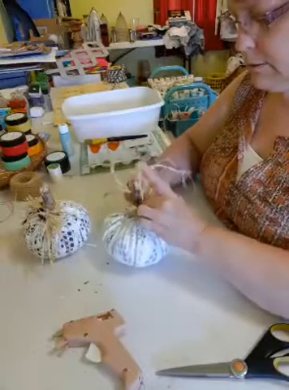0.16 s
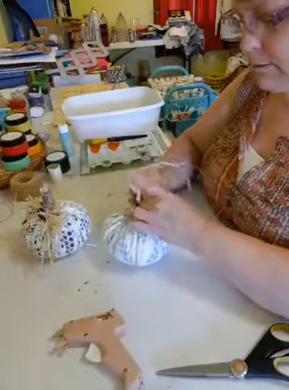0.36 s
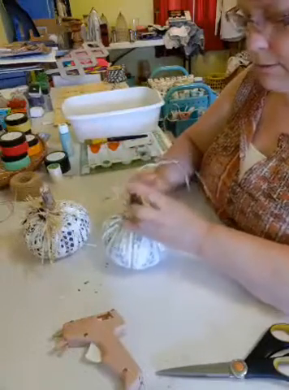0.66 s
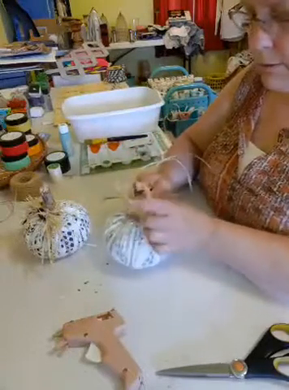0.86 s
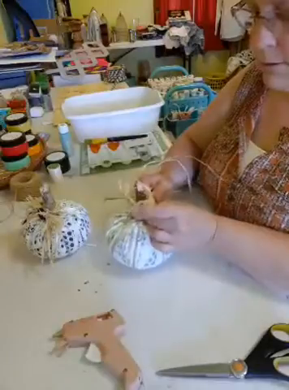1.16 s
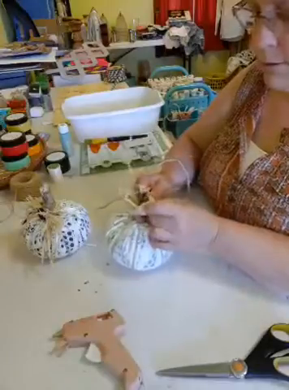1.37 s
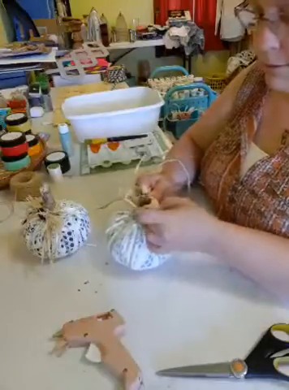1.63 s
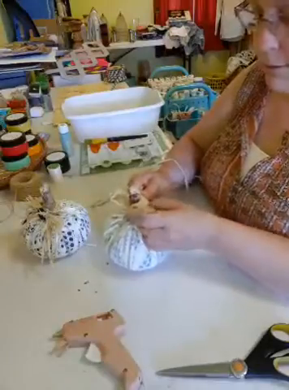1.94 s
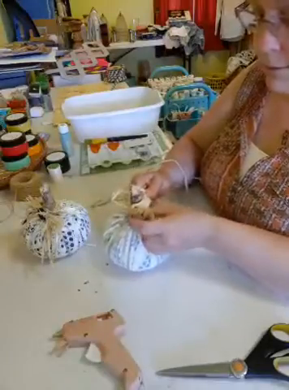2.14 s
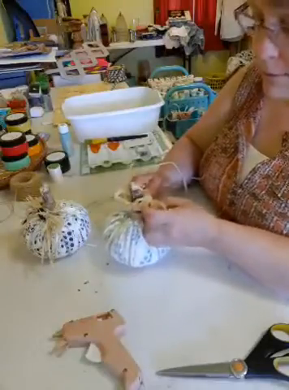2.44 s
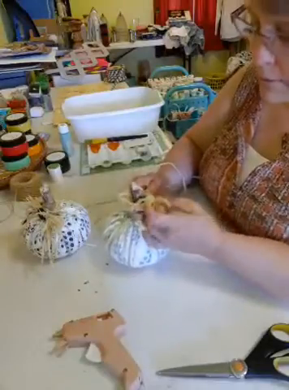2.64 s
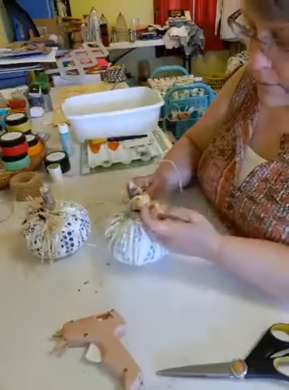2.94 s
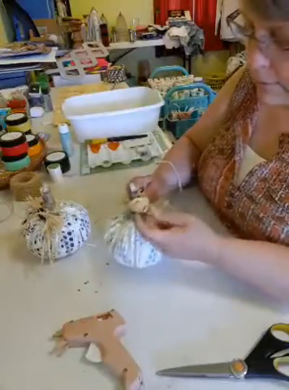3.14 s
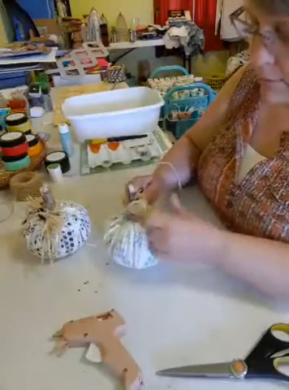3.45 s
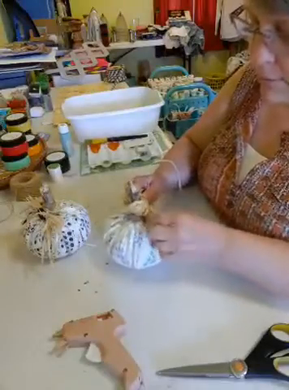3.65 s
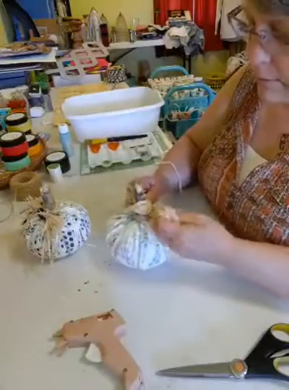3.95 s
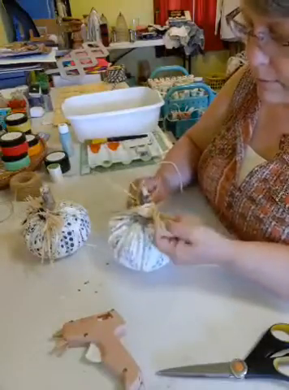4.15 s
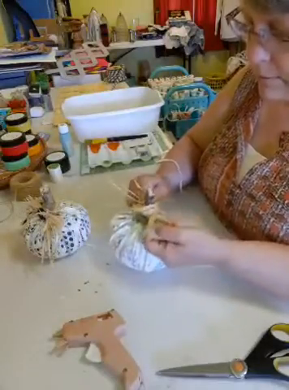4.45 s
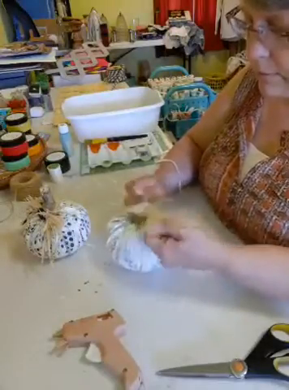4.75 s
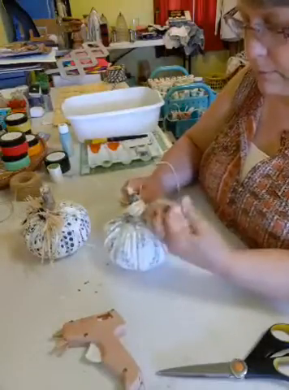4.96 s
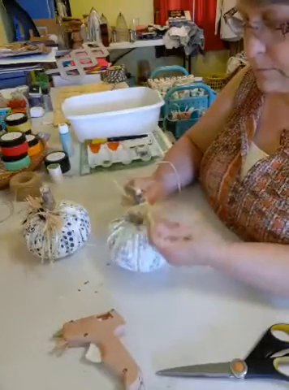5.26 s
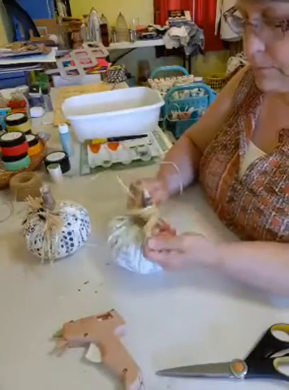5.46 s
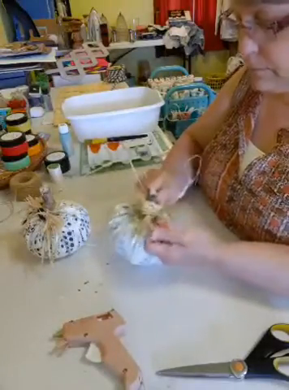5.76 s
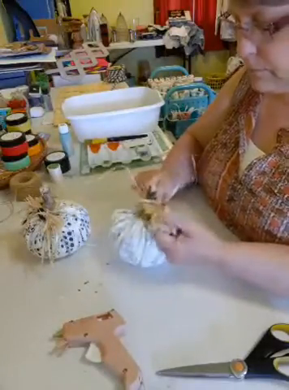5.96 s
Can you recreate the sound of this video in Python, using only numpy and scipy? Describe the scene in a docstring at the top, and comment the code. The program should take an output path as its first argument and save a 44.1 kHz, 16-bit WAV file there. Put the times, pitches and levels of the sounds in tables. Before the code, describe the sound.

Hands tie dry raffia round the stem of a small fabric pumpkin, heard close in a small room. Papery rustling never quite stops, with short scratchy pulls and bright little snaps. Soft finger taps come mostly early, the crackle grows denser and sharper from the middle on, and a brief hand rub comes near the end. A low electrical hum throbs gently underneath.

```python
"""A small room with a craft table: hands tie dry raffia round the stem of a fabric pumpkin, close up.
Pulled strands crackle as dense stick-slip clicks through strand resonances; kinks snap as ringing clicks.
Fingers tap (damped modes), brush and rub the pumpkin (filtered friction); strand ends flick the stem.
Soft bumps push the table (sinking low tones), and the room hums with a slow throb (beating sines) over air noise."""
import sys
import numpy as np
from scipy import signal
from scipy.fft import rfft, irfft, next_fast_len
from scipy.io import wavfile
from scipy.ndimage import map_coordinates

SR = 44100
rng = np.random.default_rng(int(sys.argv[2]) if len(sys.argv) > 2 else 0)


def store_wav(level_fs):
    """Save 16-bit WAV to argv[1]."""
    pcm = np.round(np.clip(np.atleast_2d(level_fs), -1, 1) * 32767)
    wavfile.write(sys.argv[1], SR, pcm.T.astype(np.int16))


N = 269010
T = np.arange(N) / SR  # time in s

# mains hum and motors running just beside it: [f/Hz, rms level/dB]
HUM_LINES = [(58.1, -74), (113.2, -85), (116.7, -80), (120, -55), (123.4, -73.5), (126.8, -78), (240, -82)]
# colour of the room air: [f/Hz, density/dB per Hz, relative]
AIR_COLOUR = [(20, -31), (35, -27), (57, 1), (80, -7.5), (110, 0), (170, -6), (220, -4.5), (310, -9),
              (400, -6.5), (750, -11), (1100, -14.5), (1750, -13), (2500, -17), (3500, -21), (8000, -8),
              (14000, -25.5)]
# decay of the room's answer: [f/Hz, t60/s]
ROOM_DECAY = [(200, 0.29), (2000, 0.14), (8000, 0.27), (14000, 0.089)]
# soft bumps on the table: [t/s, peak level/dB]
TABLE_BUMPS = [(0.438, -41), (2.26, -59)]
# fingers tapping pumpkin and stem: [t/s, peak level/dB before tap_db, nominal pitch f/Hz, nominal t60/s]
FINGER_TAPS = [(0.203, -43, 650, 0.0082), (.381, -53, 467, 0.049), (0.416, -47.5, 640, 0.013),
               (0.526, -44.5, 514, 0.054), (.538, -45, 614, 0.021), (1.119, -31, 863, 0.0072),
               (1.306, -44.5, 1320, .008), (1.461, -48.5, 550, 0.014), (1.614, -47, 1090, 0.0073),
               (3.369, -45.5, 1110, 0.013), (4.874, -48.5, 690, 0.015)]
# modes of a tapped pumpkin: [multiple of the pitch, level/dB, multiple of the t60]
TAP_MODES = [(.46, -13, 2.3), (.97, -4.5, 1.8), (1.45, 4.5, 0.46), (2.9, -14, 0.5)]
# a soft fingertip passes little treble: [f/Hz, gain/dB]
FINGERTIP_COLOUR = [(150, -14), (350, 3.5), (1500, 0), (2000, -2), (4000, -10)]
# stiff strand ends flicking the stem: [t/s, peak level/dB, pitch f/Hz]
STEM_FLICKS = [(0.081, -40, 2900), (1.0762, -40.5, 3200), (4.128, -41, 3300), (4.5218, -42, 3120),
               (4.535, -46, 3500), (5.367, -45, 2200), (5.386, -45, 4100)]
# skin brushing over cloth: [middle t/s, length/s between 1/e points, nominal level/dB at the middle]
BRUSH_STROKES = [(.2, 1, -64), (.4, .07, -63.5), (0.607, 0.12, -58.5), (0.758, .05, -62), (1.15, 0.04, -57),
                 (1.31, 0.036, -55), (1.687, 0.11, -60.5), (2.31, 0.045, -56), (2.603, 0.63, -63),
                 (3.099, 0.076, -58.5), (3.39, .06, -64.5), (3.614, 0.05, -67), (4.073, 0.034, -60),
                 (4.958, 0.053, -59.5), (5.275, 0.11, -63), (5.867, 0.21, -66.5)]
# colour of the cloth: [f/Hz, density/dB per Hz, relative]
CLOTH_COLOUR = [(150, -29), (400, -1.5), (620, 1.5), (850, 1.5), (1300, 0.5), (2000, -5.5), (2700, -3),
                (3600, -2), (7000, -24)]
# one long rub of the hand over the pumpkin: [t/s, level/dB]
RUB_LEVEL = [(5.34, -78), (5.41, -57), (5.45, -52.5), (5.49, -50), (5.515, -50), (5.54, -59), (5.6, -85)]
# colour of that rub before the body ring: [f/Hz, density/dB per Hz, relative]
RUB_COLOUR = [(200, -28), (600, -14), (900, 3.5), (1100, -3), (1370, 1), (1950, -5), (2700, -0.5),
              (3400, -1.5), (4600, -3), (8000, -18)]
# the strands never quite rest between the fingers: [t/s, nominal level/dB]
HANDLING_LEVEL = [(0, -44), (.42, -52.5), (.49, -50.5), (.72, -49), (.85, -46.5), (.91, -55), (1.0, -51.5),
                  (1.3, -48.5), (1.75, -50), (1.92, -70), (2.05, -56), (2.4, -52), (4.25, -48.5),
                  (4.47, -50.5), (5.2, -49), (6.1, -47)]
# pulls of raffia through the fingers:
# [start t/s, length/s, nominal start level/dB, nominal coarse scratch over fine crackle/dB]
RAFFIA_PULLS = [(0, 0.251, -43.5, -8), (0.316, 0.1, -44.5, -7), (0.519, .125, -43, -4.5),
                (0.936, 0.079, -45, -6), (1.066, 0.1, -45.5, -2), (1.388, 0.1, -48, -7),
                (1.628, .15, -51.5, -5), (1.824, 0.025, -51, -9), (1.949, 0.022, -45.5, -7),
                (2.138, 0.065, -51, -6), (2.222, 0.412, -45.5, -5.5), (2.486, 0.064, -41, -17),
                (2.76, 0.022, -39, -1), (2.781, 0.13, -45, -3.5), (2.926, 0.063, -40.5, -8),
                (3.012, 0.027, -42.5, -9), (3.051, 0.054, -38.5, -2), (3.191, 0.019, -44, -3),
                (3.318, 0.092, -44, -13.5), (3.492, 0.072, -47, -12), (3.567, 0.042, -34.5, -12.5),
                (3.606, 0.044, -49.5, 5), (3.697, 0.042, -40.5, -10), (3.827, 0.12, -41.5, -2.5),
                (3.973, 0.054, -44.5, -12), (4.008, 0.14, -41.5, -21), (4.52, 0.16, -50, -12),
                (4.651, 0.054, -37.5, -16), (4.75, 0.069, -40, -16), (4.828, 0.044, -37.5, -5.5),
                (4.886, 0.065, -48.5, -10), (5.021, 0.076, -42.5, -15), (5.188, 0.079, -48.5, -11),
                (5.382, 0.19, -47.5, -16), (5.44, 0.052, -39, -8.5), (5.797, 0.133, -44, -10),
                (5.94, 0.17, -46.5, -6)]
# colour of thin fibre edges: [f/Hz, density/dB per Hz, relative]
FINE_COLOUR = [(300, -26.5), (1000, -41), (2200, -27), (3600, -23.5), (6000, -16.5), (7000, -8), (7650, -5),
               (8050, 0.5), (8500, -2.6), (9200, -13), (9950, -15.5), (10250, -26.5), (11500, -17),
               (14300, -28)]
# colour of broad ribbons: [f/Hz, density/dB per Hz, relative]
COARSE_COLOUR = [(250, -17.5), (900, -21), (1900, -18.5), (3000, -10), (3700, -9), (4700, -1), (5300, -2.5),
                 (5900, 0.4), (7200, 4), (8200, -3.5), (10000, -8), (12000, -5.5), (14300, -5)]
# lowest and highest ring of a loose strand: [f/Hz]
STRAND_RANGE = (5200, 9200)
# kinks of single strands:
# [t/s, level/dB before SNAP_DB, coarse scratch over fine click/dB, ring f/Hz, splitting time/ms before limits]
STRAND_SNAPS = [(0.0798, -35, 0, 7000, 1), (0.0874, -38, -5, 7800, 1), (0.1556, -37, -3, 7200, 2),
                (0.2576, -40, -12, 8600, 1), (0.3041, -37, -17, 8400, 1), (0.3401, -38, -7, 8100, 1),
                (0.3566, -38, -12, 8200, 1), (0.4108, -38, -8, 8000, 1), (0.4598, -40, -4, 7000, 3),
                (0.5703, -38, -7, 8000, 1), (0.6466, -31, 3, 6200, 13), (0.8439, -34, -13, 7900, 1),
                (0.8514, -40, -9, 8000, 1), (0.8726, -40, -9, 8200, 1), (0.9766, -41, -6, 7000, 1),
                (1.0335, -38, -8, 8900, 1), (1.0466, -40, -1, 7300, 2), (1.0764, -40, -9, 8400, 1),
                (1.0815, -34.5, -16, 8500, 1), (1.1196, -38, -10, 7600, 1), (1.1509, -36, -6, 7900, 1),
                (1.232, -41, -6, 7900, 2), (1.2727, -39, 2, 6200, 1), (1.3756, -41, -12, 8400, 1),
                (1.3895, -42, -6, 7800, 1), (1.3942, -39, 0, 6200, 1), (1.4361, -39, -8, 7900, 1),
                (1.6645, -43, -7, 8000, 1), (1.6963, -42, -7, 8000, 1), (1.9343, -52, -10, 8300, 1),
                (2.083, -43, -5, 8400, 3), (2.1513, -37, -3, 6400, 1), (2.1816, -33, -9, 8000, 2),
                (2.3367, -37, -7, 6700, 1), (2.4608, -38, -3, 7800, 2), (2.4868, -38, -6, 7400, 2),
                (2.5009, -32, -4, 8000, 1), (2.5419, -26, -8, 7500, 1), (2.5513, -32, 1, 6500, 1),
                (2.5975, -36, 5, 7400, 1), (2.6317, -38, 2, 6500, 1), (2.6937, -37, -3, 8500, 2),
                (2.7431, -43, -8, 8000, 1), (2.7705, -33, 5, 5000, 2), (2.7766, -32, -4, 7900, 1),
                (2.8326, -38, -7, 7800, 1), (2.8769, -37, -9, 7800, 1), (2.9476, -27, -18, 7400, 2),
                (2.9776, -25, -6, 7100, 1), (3.0391, -32, -3, 8000, 1), (3.0779, -31, 4, 4700, 4),
                (3.0956, -31, -6, 8400, 1), (3.1074, -26, -2, 7600, 2), (3.1394, -36, -9, 8000, 1),
                (3.1909, -35, -11, 7900, 3), (3.2399, -41, -9, 8100, 1), (3.2823, -37, -3, 8100, 3),
                (3.3992, -36, -15, 8700, 1), (3.4298, -37, -10, 8200, 1), (3.4576, -35, -15, 9100, 1),
                (3.5721, -35, -12, 8100, 1), (3.5875, -31, -10, 7900, 2), (3.6004, -30, 6, 5300, 2),
                (3.734, -38, -1, 5000, 1), (3.7841, -36, -7, 8200, 1), (3.8261, -42, -10, 8200, 1),
                (3.8815, -27, -2, 7400, 1), (3.9193, -23, 3, 5600, 1), (3.9298, -34, -5, 8000, 1),
                (3.9374, -30, -1, 8200, 1), (3.9511, -36, -7, 7200, 1), (3.9681, -33, -11, 8200, 2),
                (3.982, -32, -9, 8300, 1), (4.0275, -34, -12, 8200, 1), (4.031, -33, -12, 8100, 1),
                (4.0428, -35, -1, 5600, 1), (4.0568, -28, -12, 8300, 1), (4.0692, -31, 0, 5600, 1),
                (4.0744, -30, 8, 6700, 1), (4.0873, -34, -9, 8300, 1), (4.1127, -25, -34, 8300, 2),
                (4.1371, -36, -14, 8400, 1), (4.1687, -40, -12, 8300, 1), (4.2167, -43, -10, 8100, 1),
                (4.2296, -37, -8, 8100, 1), (4.2441, -39, -17, 8300, 1), (4.274, -38, -15, 8300, 1),
                (4.4556, -38, -10, 7100, 1), (4.5289, -40, -8, 8900, 1), (4.5528, -42, -10, 8200, 1),
                (4.5686, -41, -12, 8300, 1), (4.6169, -40, -10, 8100, 1), (4.623, -38, -14, 8200, 1),
                (4.6369, -34, -8, 8300, 1), (4.6458, -25, -20, 7900, 1), (4.6561, -35, -16, 8000, 1),
                (4.663, -35, -12, 7800, 1), (4.6828, -29, -17, 8200, 5), (4.6943, -33, -15, 7500, 1),
                (4.7202, -33, -16, 8000, 1), (4.7272, -35, -15, 8200, 1), (4.7468, -37, -14, 8200, 1),
                (4.7544, -37, -14, 8000, 1), (4.7713, -31, -17, 8300, 2), (4.7866, -34, -16, 8200, 1),
                (4.8155, -33, -15, 8300, 5), (4.8525, -32, -17, 8000, 1), (4.8724, -35, -9, 8200, 1),
                (4.9497, -41, -8, 8000, 1), (4.9684, -42, -8, 7800, 1), (5.0031, -40, -11, 8700, 1),
                (5.0291, -35.5, -3, 7400, 1), (5.0354, -36, -2, 6400, 2), (5.1395, -36, -4, 7600, 2),
                (5.1991, -39, -15, 8000, 1), (5.2218, -37, -15, 8000, 1), (5.2428, -40, -10, 8000, 1),
                (5.3672, -35, -6, 8100, 2), (5.3976, -37, -6, 8400, 2), (5.5964, -40, -9, 8300, 1),
                (5.6326, -43, -6, 7600, 1), (5.6852, -38, -9, 8500, 2), (5.7811, -38, -15, 8400, 1),
                (5.8322, -34, -14, 8400, 4), (5.8972, -38, -6, 7800, 1), (5.9246, -39, -6, 8100, 1),
                (5.9824, -37, -9, 8200, 1), (6.0106, -33, -3, 7100, 1), (6.0431, -37, 1, 6400, 1)]
# energy a kink pours into the strand: [f/Hz, gain/dB]
KINK_COLOUR = [(1000, -4), (3200, -7.5), (4600, 0), (8800, 0), (10500, -6), (14000, -8)]
# the fine click of a kink has hardly any low end: [f/Hz, gain/dB]
CLEAN_KINK_COLOUR = [(2000, -12), (3600, -9), (5500, 0)]

TOP_HZ = 14280  # band limit of the recorder
BODY_HZ, BODY_T60_S = 873, .13  # faint hollow ring of the pumpkin
RUB_RING_DB = 3  # how strongly the rub sounds that body
HANDLING_SCRATCH_DB = -8.5  # nominal coarse scratch over fine crackle
ATTACK_S, RELEASE_S = 0.017, .018  # a pull takes hold; the strands settle after it
TIGHTEN_DB = 1.5  # rise from start to end of a pull as the strand tightens
SLIPS_PER_S = 1100  # at the average level of sliding
SMALL_KINKS_PER_S = 15
SMALL_KINK_DB, SMALL_SPREAD_DB = -5.5, 2  # over the level of the sliding, before SNAP_DB; scatter
SMALL_SCRATCH_DB = -6  # coarse scratch of a small kink over its fine click
KINK_FOLLOWS = 0.6  # share of the sliding's swings in dB that small kinks follow
SNAP_DB = -2.7  # trim of every kink
TEAR, SPLIT = 0.25, 0.24  # ragged tail and splitting fibres relative to the click, before filtering


def amp(db):
    """Decibels to gain."""
    return 10 ** (np.asarray(db) / 20)


def unit(x):
    """Scale to rms 1."""
    return x / np.sqrt(np.mean(x ** 2) + 1e-20)


def along(points, hz):
    """Read (f/Hz, value) points on a log frequency axis."""
    f, value = np.transpose(points)
    return np.interp(np.log(hz + 1), np.log(f), value)


def wobble(rate):
    """A smooth random curve with rate knots a second."""
    return map_coordinates(rng.standard_normal(int(N * rate / SR) + 4), [T * rate])


def coloured(x, spectrum):
    """Minimum-phase filter with the given spectrum: a click rings only after it strikes."""
    m = 2 * next_fast_len(len(x) // 2 + 512)
    log_gain = np.log(amp(along(spectrum, np.fft.rfftfreq(m, 1 / SR))))
    # folding the cepstrum forward makes the filter causal
    cepstrum = irfft(log_gain, m)
    cepstrum[1:m // 2] *= 2
    cepstrum[m // 2 + 1:] = 0
    return irfft(rfft(x, m) * np.exp(rfft(cepstrum)), m)[:len(x)]


def add(track, s, sound):
    """Mix a sound into the track at time s."""
    part = track[max(0, round(s * SR)):][:len(sound)]
    part += sound[:len(part)]


def strand_ring(x, hz, ring_db, width=0.13):
    """One resonance, ring_db high, its skirts reaching width (in log frequency) to each side."""
    low, high = hz * np.exp(-abs(width)), hz * np.exp(abs(width))
    return coloured(x, [(low, 0), (hz, ring_db), (high, 0)])


def slips(rate, spread_db, hiss):
    """Tiny stick-slip releases, rate a second and of uneven size, on smooth friction hiss."""
    size = amp(spread_db * np.clip(rng.standard_normal(N), -2, 1.7))
    clicks = (rng.random(N) < rate / SR) * rng.choice([-1, 1], N) * size
    # dividing by sqrt(rate) keeps denser slips from growing louder
    return unit(unit(clicks / np.sqrt(rate)) + hiss * rng.standard_normal(N))


def background(air_db=-57.5):
    """Close hum lines beat a few times a second over steady air noise."""
    hum = sum(amp(db) * np.sqrt(2) * np.sin(2 * np.pi * (hz * T + rng.random())) for hz, db in HUM_LINES)
    air = unit(coloured(rng.standard_normal(N), AIR_COLOUR))
    return hum + amp(air_db) * air


def room(x):
    """The room's short answer: decaying noise with its own t60 per band, redrawn five times a second."""
    out, step = np.zeros(N), SR // 5
    for start in range(0, N, step):
        hz, t, z = signal.stft(rng.standard_normal(SR // 3), SR, nperseg=256)
        decay = amp(-60 * t / along(ROOM_DECAY, hz)[:, None])
        tail = signal.istft(z * decay, SR, nperseg=256)[1]
        answer = signal.fftconvolve(x[start:start + step], tail / np.linalg.norm(tail))
        add(out, start / SR + .003, answer)  # 3 ms pre-delay
    return out


def bumps(bump_hz=62, sag_hz_per_s=700):
    """A low push through the table, sinking in pitch and over in about two cycles."""
    out = np.zeros(N)
    for s, db in TABLE_BUMPS:
        t = T - s
        swell = np.exp(-(t * bump_hz) ** 2)
        out += amp(db) * swell * np.cos(2 * np.pi * (bump_hz - sag_hz_per_s * t / 2) * t)
    return out


def taps(tap_db=1.0, scuff=0.15, body_db=-28):
    """A soft fingertip rings damped modes and the hollow body, with a short scuff; long taps start softly."""
    out, t = np.zeros(N), np.arange(4096) / SR
    for s, db, hz, t60 in FINGER_TAPS:
        ring = np.zeros(len(t))
        for i, (multiple, level, life) in enumerate(TAP_MODES):
            mode = amp(level - 60 * t / (life * t60)) * np.cos(2 * np.pi * hz * multiple * t)
            # neighbouring modes swing in opposite directions, so they fill the gaps between them
            ring += (-1) ** i * mode
        ring += scuff * unit(coloured(rng.standard_normal(len(t)), CLOTH_COLOUR)) * amp(-60 * t / 0.053)
        ring += amp(body_db - 60 * t / BODY_T60_S) * np.sin(2 * np.pi * BODY_HZ * t)
        onset = 1 - np.exp(-40 * t / t60)
        tap = coloured(ring * onset, FINGERTIP_COLOUR)
        add(out, s, amp(db + tap_db) * tap / np.abs(tap).max())
    return out


def flicks(rasp=0.22, rasp_t60=0.011):
    """A stiff end flicks the stem: click and rasp through a resonance make a short woody tick."""
    out, t = np.zeros(N), np.arange(768) / SR
    for s, db, hz in STEM_FLICKS:
        click = (t == 0) + rasp * rng.standard_normal(len(t)) * amp(-60 * t / rasp_t60)
        wood = [(.55 * hz, -30), (.82 * hz, -4), (hz, 0), (1.25 * hz, -7), (2 * hz, -9), (3 * hz, -28)]
        tick = coloured(click, wood)
        add(out, s, amp(db) * tick / np.abs(tick).max())
    return out


def brushes():
    """Skin on cloth: soft grainy friction in strokes that swell and fade."""
    stroke = sum(amp(db) * np.exp(-(2 * (T - s) / length) ** 2) for s, length, db in BRUSH_STROKES)
    return stroke * unit(coloured(slips(2000, spread_db=5, hiss=.6), CLOTH_COLOUR))


def rub():
    """The hand slides over the pumpkin: a dense scrape swells late and faintly sounds the hollow body."""
    scrape = coloured(rng.standard_normal(N), RUB_COLOUR)
    scrape = strand_ring(scrape, BODY_HZ, RUB_RING_DB, width=0.077)
    level = np.interp(T, *np.transpose(RUB_LEVEL), left=-120, right=-120)
    return amp(level) * unit(scrape)


def sliding_effort():
    """Level (dB) and scratch gain of the sliding: pulls take hold, tighten and let go over the handling."""
    power = amp(np.interp(T, *np.transpose(HANDLING_LEVEL))) ** 2
    weighted_scratch = HANDLING_SCRATCH_DB * power
    for s, length, db, scratch_db in RAFFIA_PULLS:
        hold = np.clip((T - s) / ATTACK_S, 0, 1)
        grip = hold * np.exp(-np.maximum(T - s - length, 0) / RELEASE_S)
        tighten_db = TIGHTEN_DB * np.clip((T - s) / length, 0, 1)
        pull = (grip * amp(db + tighten_db)) ** 2
        power = power + pull
        weighted_scratch = weighted_scratch + scratch_db * pull
    return 10 * np.log10(power), amp(weighted_scratch / power)


def crackle(rate, spectrum, size_spread_db=3.5, hiss=0.25, count=4):
    """Several strands crackle at once, each with its own ring, taking turns to lead."""
    strands = np.zeros(N)
    for hz in np.linspace(*STRAND_RANGE, count):
        lead = amp(3.5 * wobble(45))
        strands += lead * strand_ring(slips(rate / count, size_spread_db, hiss), hz, ring_db=7)
    return unit(coloured(strands, spectrum))


def rustle(level, scratch, fine_db=-0.73, coarse_db=3.5, cloth_db=-28, flutter_db=1.5, unsteady_db=-0.1):
    """Harder sliding makes louder, denser slips; they catch and let go in clumps and drag on the cloth."""
    rate = SLIPS_PER_S * amp(.6 * (level - level.mean()))
    clumps = unit(amp(unsteady_db * wobble(25) + flutter_db * wobble(80) + 0.14 * wobble(360)))
    fine = amp(fine_db) * crackle(rate, FINE_COLOUR)
    coarse = amp(coarse_db) * crackle(0.97 * rate, COARSE_COLOUR)
    cloth = amp(cloth_db) * unit(coloured(rng.standard_normal(N), CLOTH_COLOUR))
    raffia = (fine + scratch * coarse) / np.hypot(1, scratch)
    return amp(level) * (clumps * raffia + cloth)


def small_kinks(level):
    """Lesser kinks at chance times and strand rings, stronger with the sliding: rows like STRAND_SNAPS."""
    count = round(SMALL_KINKS_PER_S * N / SR)
    s = (np.arange(count) + rng.random(count)) / SMALL_KINKS_PER_S
    size = np.clip(rng.standard_normal(count), -2, 2)
    swing = KINK_FOLLOWS * (np.interp(s, T, level) - level.mean())
    db = level.mean() + swing + SMALL_KINK_DB + SMALL_SPREAD_DB * size
    scratch_db = np.full(count, SMALL_SCRATCH_DB)
    return list(zip(s, db, scratch_db, rng.uniform(*STRAND_RANGE, count), rng.uniform(1, 2.2, count)))


def snaps(kinks, ring_db=6):
    """A click amid splitting fibres rings its strand and tears raggedly; the table top throws it back."""
    out, t = np.zeros(N), np.arange(768) / SR
    for s, db, scratch_db, hz, split_ms in kinks:
        split_s = np.clip(split_ms / 1000, .0014, .015)
        tear = TEAR * amp(-60 * t / 0.023)
        split = SPLIT * np.sin(np.pi * np.minimum(t / split_s, 1))
        burst = rng.standard_normal(len(t)) * (tear + split)
        burst[round(split_s / 2 * SR)] += 1  # the click, halfway through the split
        burst = strand_ring(coloured(burst, KINK_COLOUR), hz, ring_db)
        fine = unit(coloured(coloured(burst, CLEAN_KINK_COLOUR), FINE_COLOUR))
        coarse = unit(coloured(burst, COARSE_COLOUR))
        snap = amp(db + SNAP_DB) * unit(fine + amp(scratch_db) * coarse) / np.sqrt(3)
        add(out, s - split_s / 2, snap)
        add(out, s + rng.uniform(.0005, .0015), .35 * snap)  # table reflection
    return out


def scene(rustle_room_db=-14, snap_room_db=-9, tap_room_db=-12):
    """Handwork and the room's answer to it, over bumps, hum and air."""
    level, scratch = sliding_effort()
    sliding = rustle(level, scratch) + brushes() + rub()
    kinks = snaps(list(STRAND_SNAPS) + small_kinks(level)) + flicks()
    knocks = taps()
    send = amp(rustle_room_db) * sliding + amp(snap_room_db) * kinks + amp(tap_room_db) * knocks
    return (sliding + kinks + knocks + room(send) + bumps() + background())[None]


def record(dry):
    """The recorder cuts off very steeply at its band limit."""
    m = next_fast_len(N + SR // 2)
    hz = np.fft.rfftfreq(m, 1 / SR)
    return irfft(rfft(dry, m) / (1 + (hz / TOP_HZ) ** 240), m)[:, :N]


dry = scene()
out = record(dry)
store_wav(out)
```